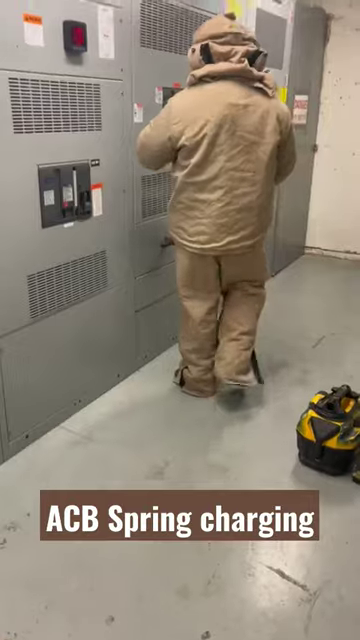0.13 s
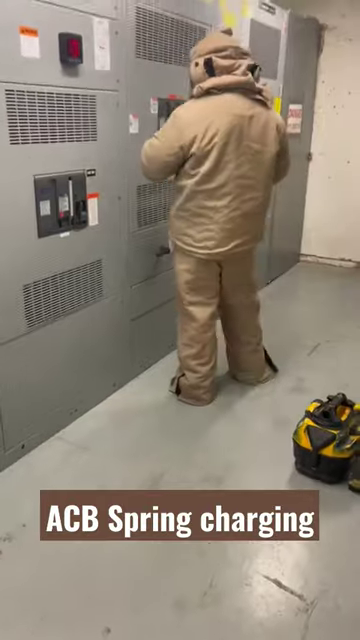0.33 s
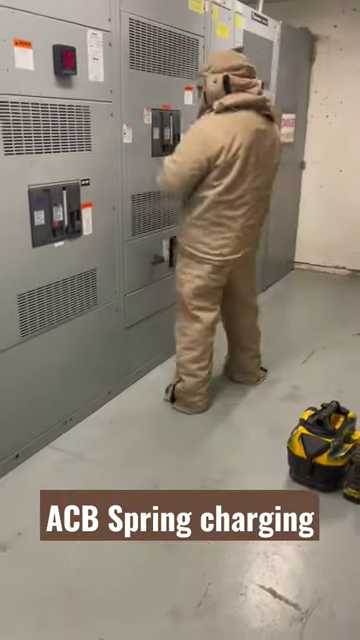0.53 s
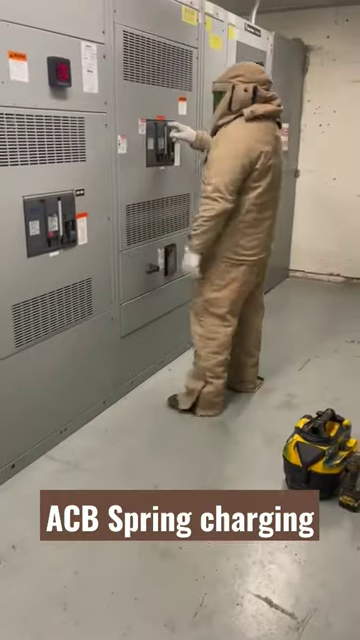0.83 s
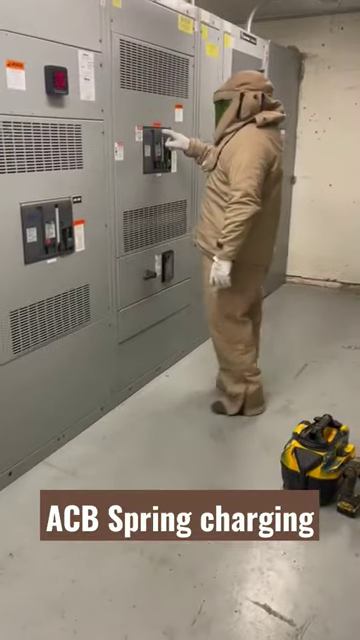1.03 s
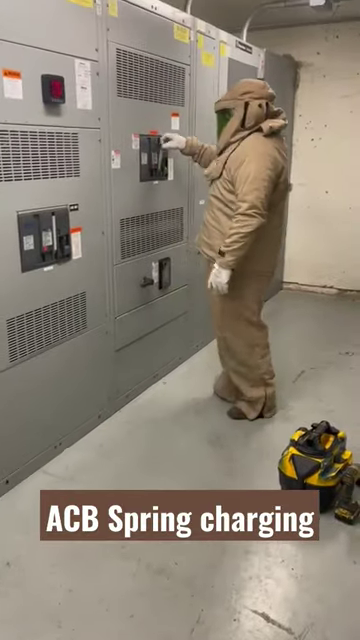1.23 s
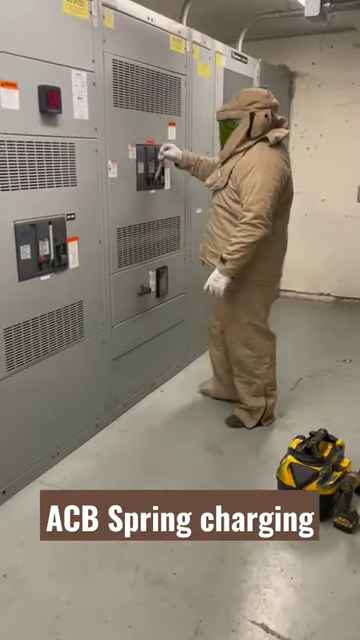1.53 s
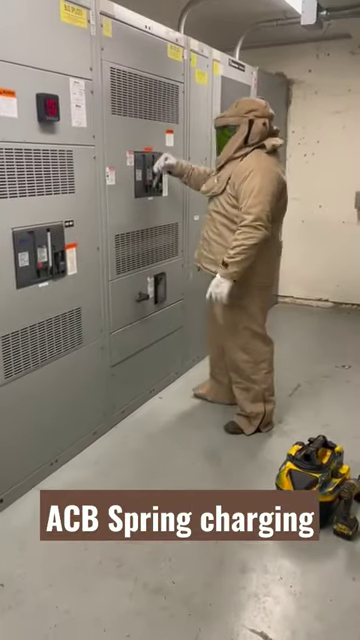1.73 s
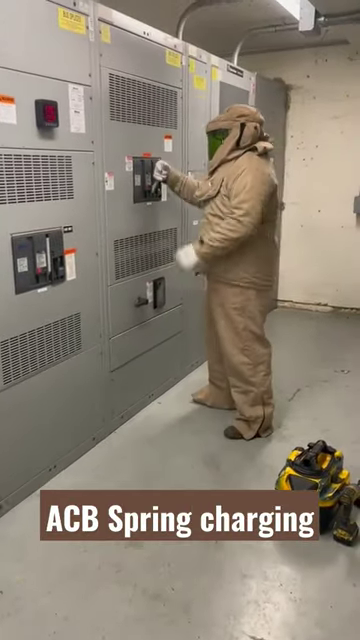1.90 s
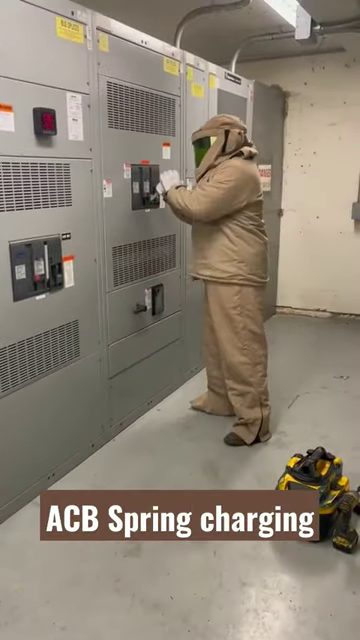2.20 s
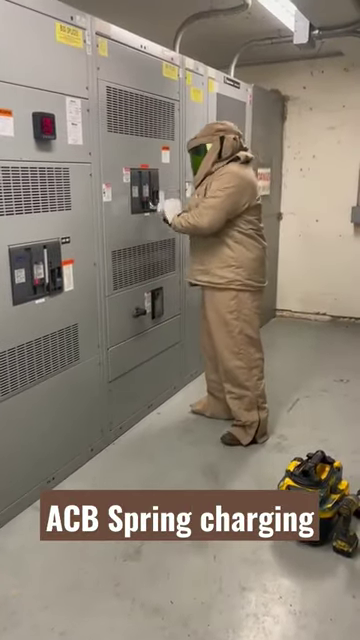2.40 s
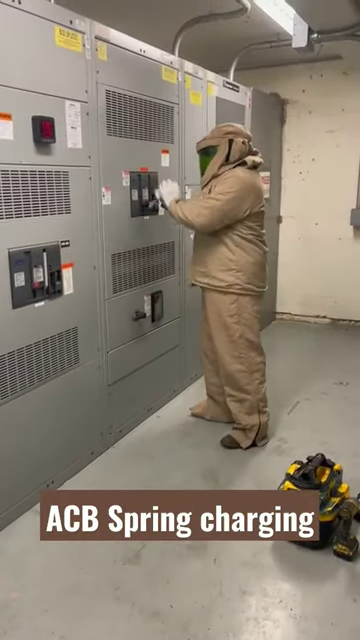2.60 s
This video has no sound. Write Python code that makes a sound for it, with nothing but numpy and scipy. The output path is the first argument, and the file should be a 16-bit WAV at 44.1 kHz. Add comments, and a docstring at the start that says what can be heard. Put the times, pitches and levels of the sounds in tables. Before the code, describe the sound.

A breaker's ratcheting handle clacks four times, at about 2.2, 2.3, 2.5 and 2.7 seconds, each a sharp steel crack with brief ringing, most with a cabinet thud, echoing in a concrete room. Earlier, a stiff protective suit rustles from 0.3 seconds, and a glove scuffs the panel between 0.8 and 1.6 seconds. A low machine throb, whining cooling fans and rushing air run steadily throughout.

```python
"""The ratchet of a breaker's spring-charging handle clacks in a hard concrete room: each impact cracks,
excites the modes of the steel parts and thuds in the cabinet. Before that, a worker steps up to the
switchboard, a heavy protective suit rustling by friction, and a glove scuffs the panel and grips the
handle. All along a slow machine throbs, cooling fans whine and air rushes."""
import sys
import numpy as np
from scipy import signal
from scipy.fft import rfft, irfft
from scipy.io import wavfile
from scipy.ndimage import uniform_filter1d

SR = 44100
rng = np.random.default_rng(int(sys.argv[2]) if len(sys.argv) > 2 else 0)


def store_pcm(level_fs):
    """Save levels as 16-bit WAV."""
    pcm = np.round(np.clip(level_fs, -1, 1) * 32767).astype(np.int16)
    wavfile.write(sys.argv[1], SR, np.atleast_2d(pcm).T)


N = 121275


def undb(db):
    """Decibels to amplitude ratio."""
    return 10 ** (np.asarray(db) / 20)


def unit(x):
    """Normalisation to rms 1."""
    return x / np.sqrt(np.mean(x ** 2))


def clock():
    """Time of every sample, in seconds."""
    return np.arange(N) / SR


def fade(t60):
    """Exponential decay, 60 dB down after t60 seconds."""
    return np.exp(-np.log(1000) * clock() / t60)


def colour(x, points, tilt_db=0):
    """Spectral shaping by (Hz, dB) points and a tilt per octave about their middle."""
    hz, db = np.array(points, float).T
    octave = np.log2(np.maximum(np.fft.rfftfreq(2 * N, 1 / SR), 1))
    db = db + tilt_db * (np.log2(hz) - np.median(np.log2(hz)))
    return irfft(rfft(x, 2 * N) * undb(np.interp(octave, np.log2(hz), db)))[:N]


def drift(rate_hz):
    """Smoothed random fluctuation of rms 1."""
    hold = int(SR / rate_hz)
    steps = np.repeat(rng.standard_normal(N // hold + 2), hold)
    return unit(uniform_filter1d(steps[rng.integers(hold):][:N], hold))


def tone(hz, db, waver=.34):
    """A sinusoid under slow random modulation of amplitude and phase."""
    wander = 1 + waver * (drift(rate_hz=4.76) + 1j * drift(rate_hz=4.76)) / np.sqrt(2)
    carrier = np.exp(2j * np.pi * (hz * clock() + rng.random()))
    return np.sqrt(2) * undb(db) * np.real(wander * carrier)


# The machine's throb. Each row: multiple of the stroke rate, relative level in dB.
STROKE_HARMONICS = [(3, -22), (4, -1), (5, 0), (6, -.6), (7, -9), (8, -7), (9, -11), (10, -9)]
# Droning cabinet panels. Each row: multiple of the stroke rate, level in dB.
PANEL_HARMONICS = [(12, -35), (17, -40), (18, -44.5), (20, -47), (22, -33), (23, -43.5), (25, -71)]
def machine(stroke_hz=15.03, centre_hz=87.5, rise_hz_per_s=2400):
    """Forced vibration: periodic bass strokes sweep upward, and panels drone on their higher harmonics."""
    t, strokes = clock() - .117, 0
    for k, db in STROKE_HARMONICS:
        hz = k * stroke_hz
        lag = np.pi * (hz - centre_hz) ** 2 / rise_hz_per_s  # higher harmonics arrive later
        strokes += undb(db) * np.sqrt(2) * np.cos(2 * np.pi * hz * t - lag)
    panels = sum(tone(k * stroke_hz, db) for k, db in PANEL_HARMONICS)
    return undb(-27.5) * strokes * (1 + .1 * drift(stroke_hz)) + panels


# Rushing air. Each row: frequency in Hz, relative spectral density in dB.
AIR_SPECTRUM = [(20, -11), (33, -27), (42, -8.5), (85, 1.5), (140, -1), (205, -6), (290, -3), (400, -7.5),
                (490, -6), (620, -14), (1000, -14), (1250, -17.5), (1600, -17.5), (2300, -21),
                (3300, -30.5), (4800, -40.5), (7000, -41.5), (8200, -83.5), (9200, -80), (13000, -73.5)]
# Swell of the fan's fundamental. Each row: time in seconds, level in dB.
BLADE_SWELL = [(.15, -27.5), (.28, -41), (.41, -28), (.52, -26.5), (.58, -42), (.66, -29), (.75, -30),
               (.87, -42), (1.0, -30), (1.15, -35), (1.32, -26), (1.5, -33), (1.66, -32.5), (1.77, -43),
               (1.95, -41), (2.02, -31.5), (2.15, -29.5), (2.25, -46), (2.38, -30.5), (2.49, -26.5),
               (2.56, -37), (2.74, -41)]
# Its overtones. Each row: multiple of the blade rate, level in dB, modulation depth from 0 to 1.
BLADE_HARMONICS = [(2, -35.5, .4), (3, -46.7, .6), (4, -54, .6)]
# Fainter whines. Each row: frequency in Hz, level in dB.
FAINT_WHINES = [(691.5, -52), (991, -52), (1066, -52), (1382.6, -49.5), (2104, -55.5), (2404, -57)]
def fans(blade_hz=477.3):
    """Blade passage gives a harmonic series, heard with faint whines over the broadband noise of air."""
    air = undb(-24.5) * unit(colour(rng.standard_normal(N), AIR_SPECTRUM))
    fundamental = tone(blade_hz, np.interp(clock(), *np.array(BLADE_SWELL).T), waver=.2)
    overtones = sum(tone(k * blade_hz, db, waver) for k, db, waver in BLADE_HARMONICS)
    return air + fundamental + overtones + sum(tone(hz, db) for hz, db in FAINT_WHINES)


def rub(spectrum, grain_db=1.8):
    """Sliding friction: noise made grainy by rapid fluctuations of level."""
    grains = rng.standard_normal(N) * undb(grain_db * drift(rate_hz=160))
    return unit(colour(grains, spectrum))


# Suit cloth, and hiss near 10-11 kHz. Each row: frequency in Hz, relative spectral density in dB.
CLOTH_SPECTRUM = [(300, -19), (1500, 9), (3500, 2), (5000, 0.5), (7700, -1), (8800, -15.5), (11000, -50),
                  (13000, -39.5)]
HISS_SPECTRUM = [(3000, -23), (8800, -10), (10000, 9.5), (11300, 9.5), (12200, -8), (13200, -25)]
# The rustle's envelope. Each row: time in seconds, level in dB.
RUSTLE_LEVELS = [(.2, -77), (.25, -54), (.285, -40), (.39, -44.5), (.45, -47.5), (.55, -56.5), (.72, -47.5),
                 (.93, -42), (1.04, -45), (1.2, -43), (1.42, -43.5), (1.55, -43), (1.63, -42), (1.8, -50.5),
                 (1.93, -46), (2.03, -53.5), (2.75, -42.5)]
# Swells of high hiss: faint ones at 0.51, 1.805 and 2.087 s fill gaps around the louder sleeve swishes.
# Each row: centre in seconds, half width in seconds, peak level in dB.
HISS_SWELLS = [(0.51, 0.074, -65.5), (0.755, 0.12, -56), (0.945, 0.089, -49.5), (1.09, 0.046, -53),
               (1.394, 0.26, -56), (1.636, 0.064, -53), (1.805, .08, -65), (1.934, 0.047, -52),
               (2.087, 0.13, -63.5)]
def suit():
    """Friction of cloth: the stiff suit rustles; faint high hiss fills gaps around louder sleeve swishes."""
    t = clock()
    rustle = undb(np.interp(t, *np.array(RUSTLE_LEVELS).T))
    swells = sum(undb(db) * np.exp(-((t - at) / half) ** 2) for at, half, db in HISS_SWELLS)
    return rub(CLOTH_SPECTRUM) * rustle + rub(HISS_SPECTRUM) * swells


# Glove on painted steel. Each row: frequency in Hz, relative spectral density in dB.
GLOVE_SPECTRUM = [(400, -10), (1500, 6), (3000, 3.5), (4300, -1.5), (5200, -7), (7500, -5.5), (9000, -24),
                  (11500, -9.5), (13000, -36)]
# Its scuffs. Each row: start in seconds, level in dB, 60 dB decay time in seconds.
GLOVE_SCUFFS = [(.799, -34.5, 0.33), (.826, -39, 0.1), (.897, -38.5, 0.49), (.925, -47, .3),
                (.94, -48, 0.092), (1.093, -33.5, 0.23), (1.174, -34.5, 0.26), (1.26, -42, 0.12),
                (1.342, -40, 0.23), (1.615, -35, .12)]
def glove(attack_s=.004):
    """Transient friction: short dry scuffs as the hand crosses the panel and grips the handle."""
    t = clock()
    rise = np.minimum(t / attack_s, 1)
    scuffs = sum(undb(db) * np.interp(t - at, t, rise * fade(t60), left=0) for at, db, t60 in GLOVE_SCUFFS)
    return rub(GLOVE_SPECTRUM) * scuffs


def impact(x):
    """Normalisation of a transient to the energy of 10 ms at rms 1."""
    return x * np.sqrt(SR / 100 / np.sum(x ** 2))


def ring(modes, t60):
    """Damped free vibration: struck steel rings on its modes, slightly detuned at each blow."""
    detune = 1 + .012 * rng.standard_normal(len(modes))
    partials = sum(undb(db) * np.sin(2 * np.pi * hz * off * clock()) for (hz, db), off in zip(modes, detune))
    return impact(fade(t60) * partials)


# Modes of the steel parts. Each row: frequency in Hz, relative level in dB.
RATCHET_MODES = [(2800, 1), (3144, 1), (3408, -6), (3870, -1), (4060, -5), (4520, -6), (5066, -7),
                 (6170, -3), (6900, -5), (7320, -1), (7580, -3), (8328, -6), (10800, -8)]
PAWL_MODES = [(2218, 0), (3004, 0), (3830, 0), (4070, 0), (4330, -3), (6230, -1), (6490, 0), (6896, -3),
              (7170, -5)]
LATCH_MODES = [(2270, 0), (2400, 0), (2530, -3), (2650, -6)]
DOOR_MODES = [(829, 0), (885, -4), (945, -3), (1728, -10), (1960, -10), (2353, -9), (2790, -10),
              (3700, -14), (3900, -14)]
# Steel-on-steel crack and cabinet thud. Each row: frequency in Hz, relative spectral density in dB.
CRACK_SPECTRUM = [(400, 12.5), (1200, 3), (2200, 9.5), (3200, 10), (4800, 5.5), (6400, 8.5), (7600, 8),
                  (8300, 1), (9100, -12), (10500, 0), (11900, -6.5), (12600, -36), (14000, -31)]
THUD_SPECTRUM = [(50, 6), (120, -3), (330, 6), (620, -1.5), (830, 3), (1100, -2.5), (1500, -3.5),
                 (2200, -9.5), (4000, -74)]
# Chatter within a contact. Each row: delay in seconds, relative level in dB.
REBOUNDS = [(0, 0), (.003, -3), (.010, -7)]
# The handle's contacts. Each row: start in seconds, crack and thud levels in dB, crack tilt in dB per
# octave, then ring levels of ratchet, pawl, latch and door in dB.
CONTACTS = [(2.171, -29.5, -53, -0.5, -52, -33, -50, -55), (2.188, -49, -50, -3, -56, -40, -44, -58),
            (2.268, -22.5, -26.5, 4, -27.5, -58, -34.5, -36), (2.283, -30, -36, -6, -36, -51, -45, -48),
            (2.528, -39, -27, 3, -51, -52, -44, -40), (2.533, -29, -24.5, 2, -40, -45, -35.5, -28),
            (2.693, -41.5, -34, 22, -64, -60, -60, -48), (2.699, -28, -30.5, -6, -56, -52, -34, -38)]
def handle():
    """Impact excitation: each contact gives a chattering crack, ringing steel and a thud in the cabinet."""
    out, t = np.zeros(N), clock()
    parts = [(RATCHET_MODES, .025), (PAWL_MODES, .025), (LATCH_MODES, .05), (DOOR_MODES, .06)]  # t60 in s
    chatter = sum(undb(db) * np.interp(t - delay, t, fade(t60=.05), left=0) for delay, db in REBOUNDS)
    for at, crack_db, thud_db, tilt_db, *rings_db in CONTACTS:
        crack = impact(colour(rng.standard_normal(N), CRACK_SPECTRUM, tilt_db) * chatter)
        thud = impact(colour(rng.standard_normal(N), THUD_SPECTRUM) * fade(t60=.11))
        ringing = sum(undb(db) * ring(*part) for db, part in zip(rings_db, parts))
        clack = undb(crack_db) * crack + ringing + undb(thud_db) * thud
        start = int(at * SR)
        out[start:] += clack[:N - start]
    return out


def room(x, split_hz=4500, delay_s=.005, tail_db=2):
    """Reverberation: concrete walls return a dense tail whose treble dies sooner."""
    low = signal.sosfilt(signal.butter(2, split_hz, fs=SR, output="sos"), rng.standard_normal(N))
    high = signal.sosfilt(signal.butter(2, split_hz, "high", fs=SR, output="sos"), rng.standard_normal(N))
    tail = (low * fade(t60=.64) + high * fade(t60=.43)) * (clock() > delay_s)
    return x + undb(tail_db) * signal.fftconvolve(x, tail / np.sqrt(np.sum(tail ** 2)))[:N]


def scene(dip_s=.282, dip_width_s=.009, dip_db=-9):
    """Superposition of all sources in one channel; fans and machine dip briefly once."""
    dip = undb(dip_db * np.exp(-((clock() - dip_s) / dip_width_s) ** 2))
    return (room(handle()) + glove() + suit() + dip * (fans() + machine()))[None]


def record(dry, start_s=.105, top_hz=13300):
    """Gating and band limiting: the sound cuts in, and a steep low-pass removes the highest treble."""
    gate = np.clip((clock() - start_s) / .002, 0, 1)
    return signal.sosfilt(signal.ellip(8, .2, 70, top_hz, fs=SR, output="sos"), dry * gate)


dry = scene()
out = record(dry)
store_pcm(out)
```